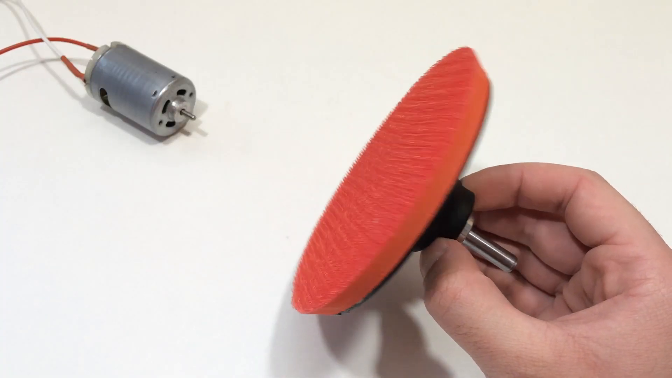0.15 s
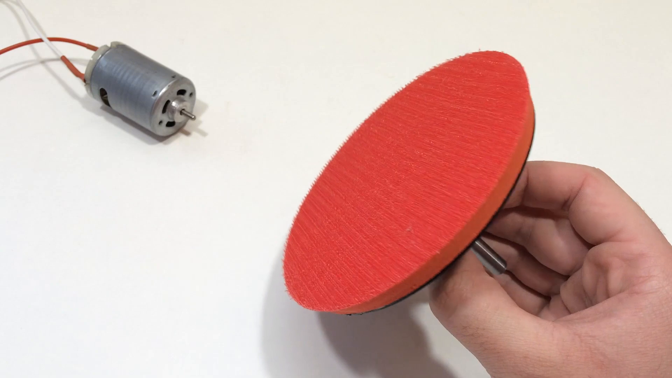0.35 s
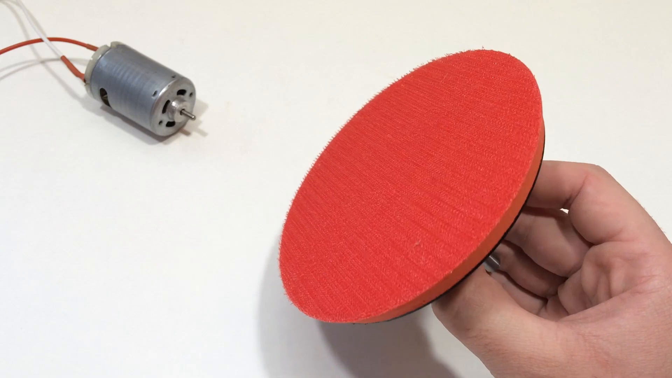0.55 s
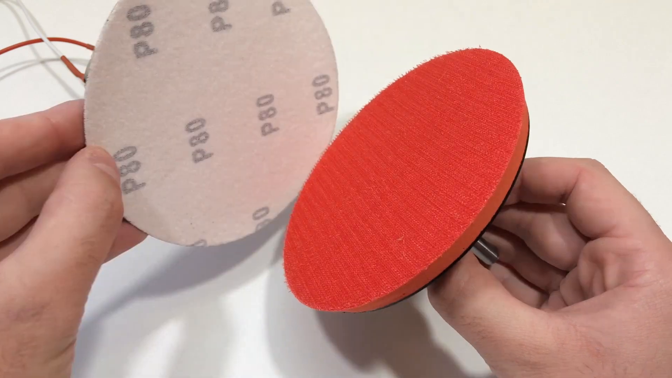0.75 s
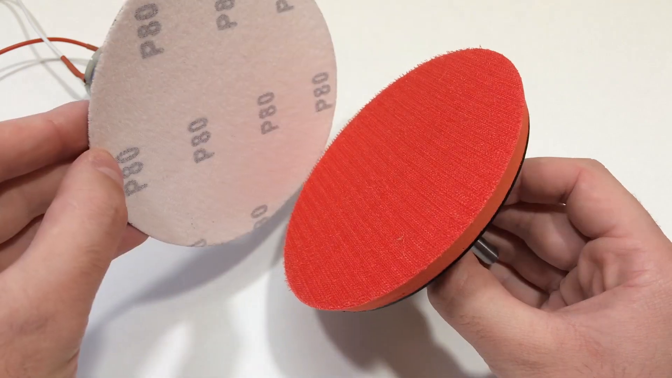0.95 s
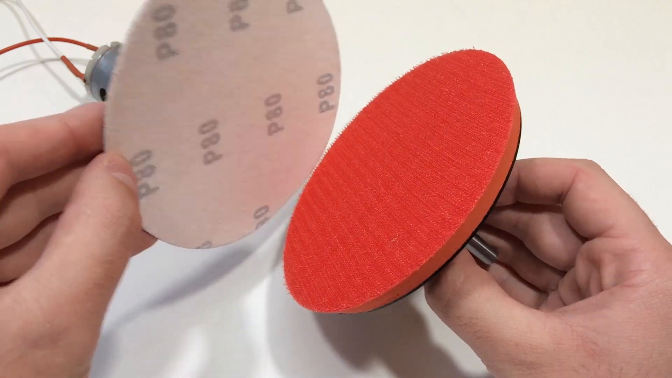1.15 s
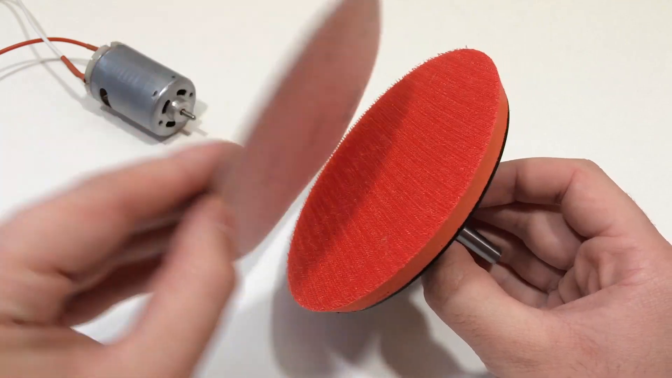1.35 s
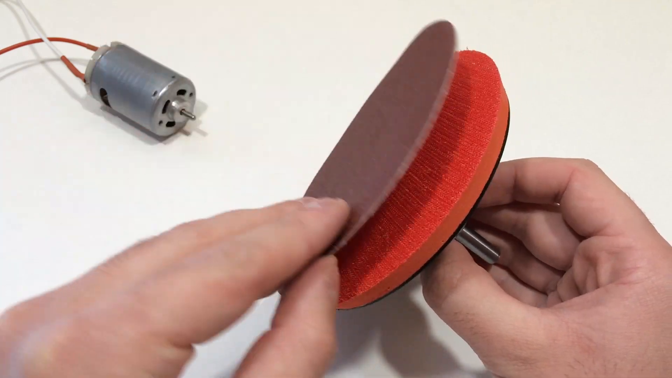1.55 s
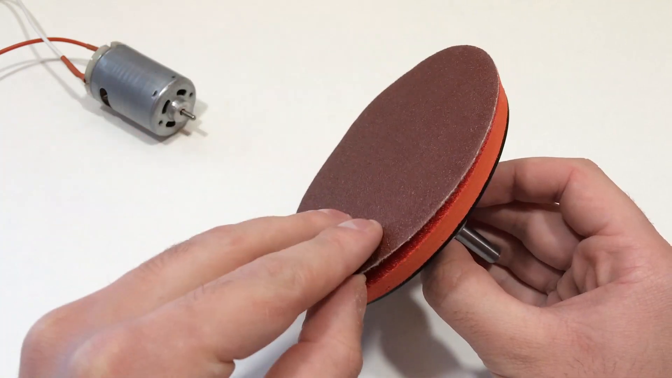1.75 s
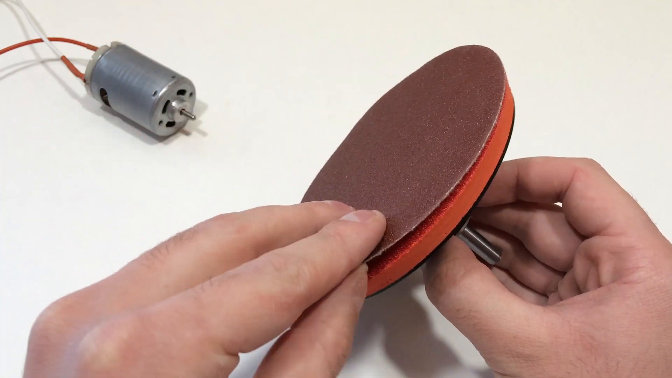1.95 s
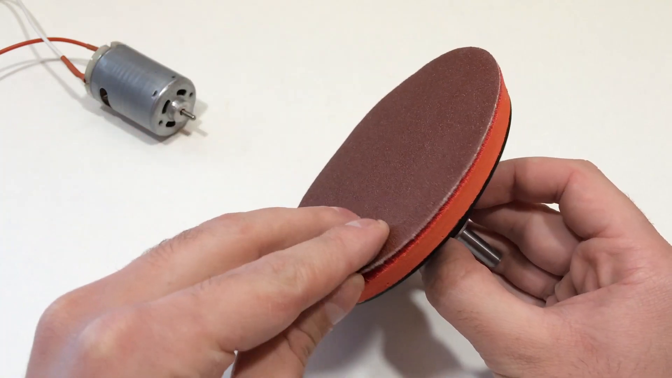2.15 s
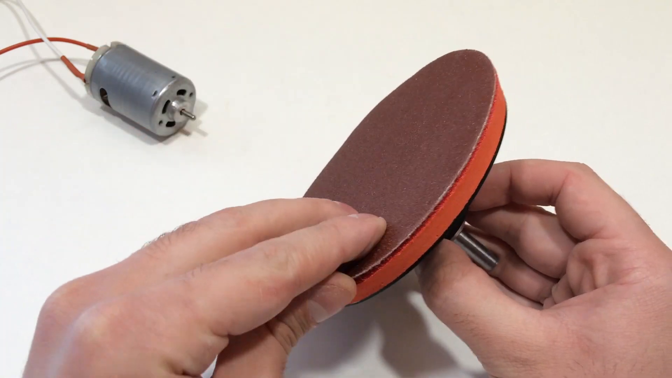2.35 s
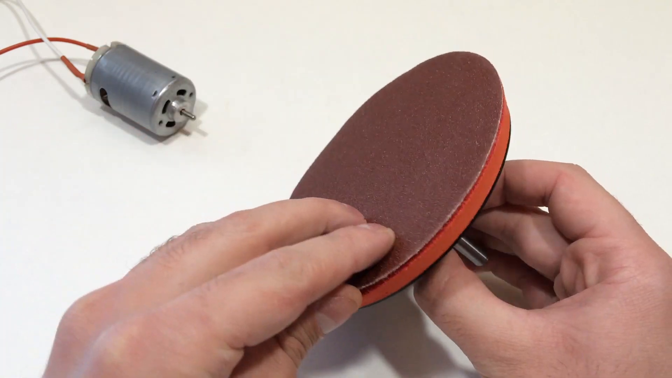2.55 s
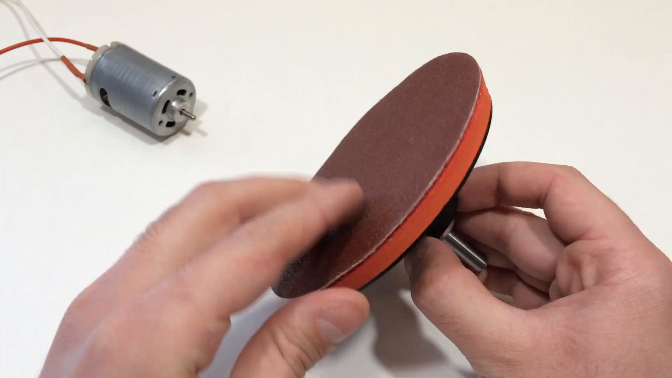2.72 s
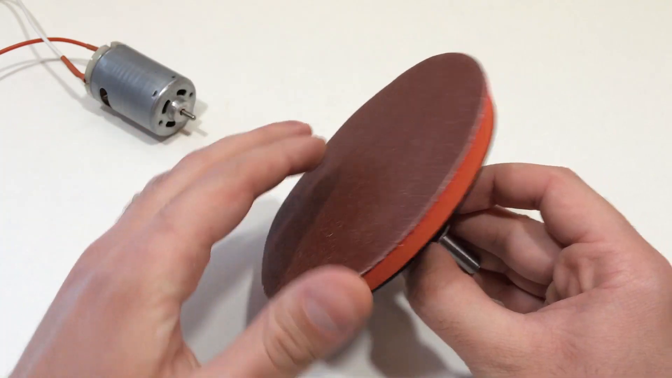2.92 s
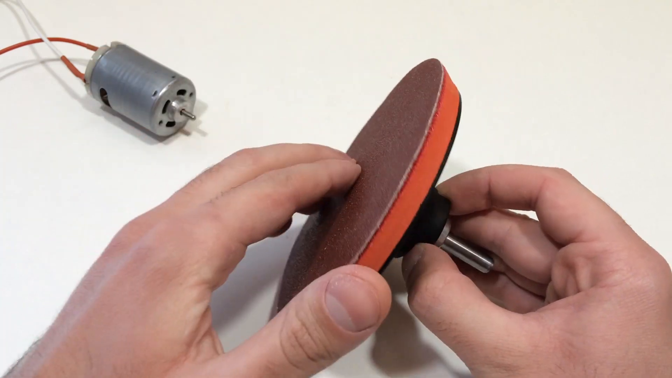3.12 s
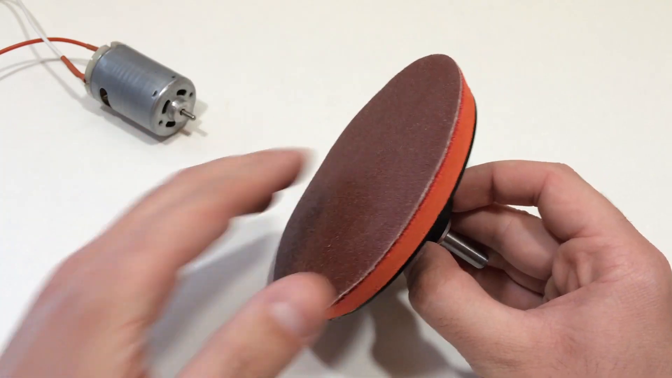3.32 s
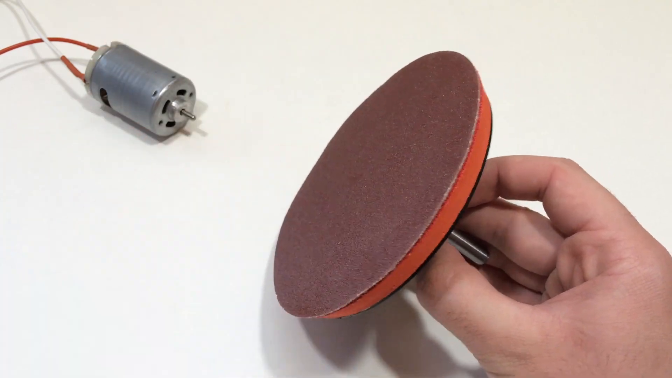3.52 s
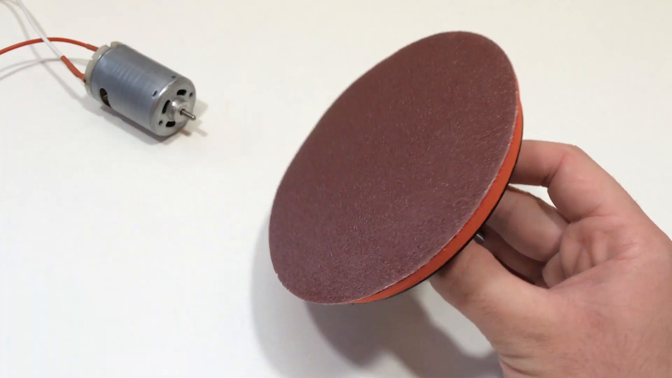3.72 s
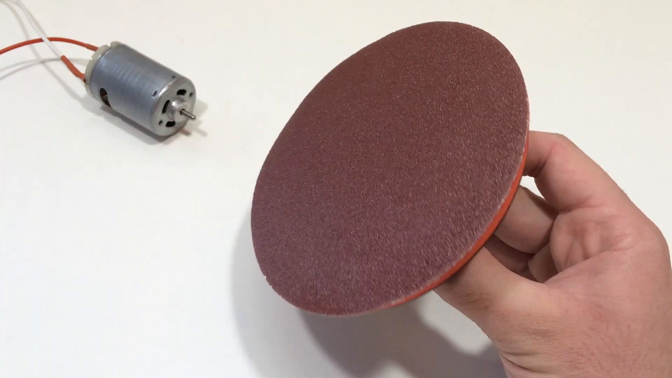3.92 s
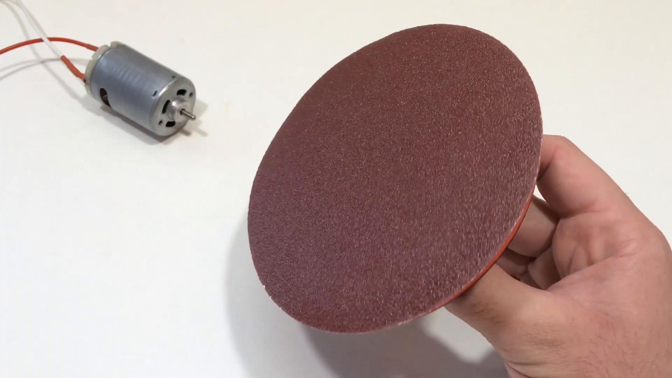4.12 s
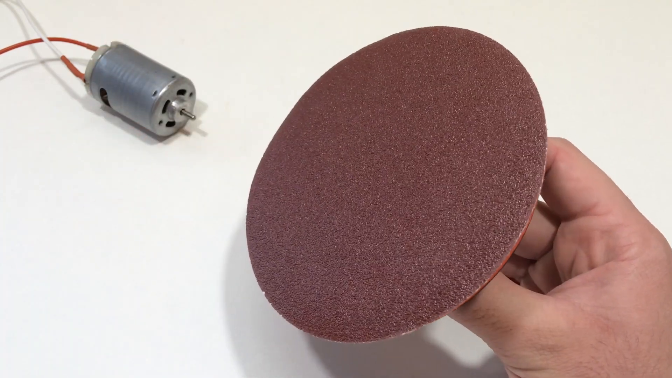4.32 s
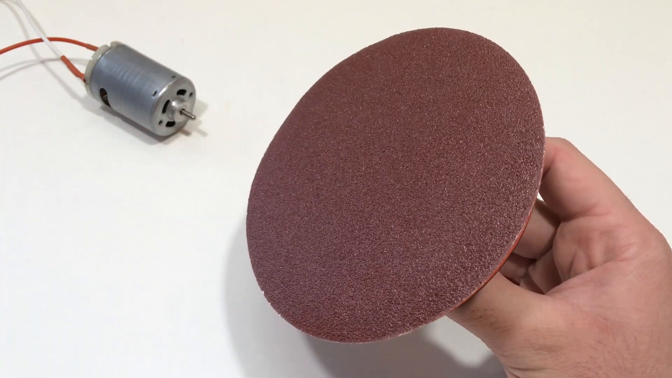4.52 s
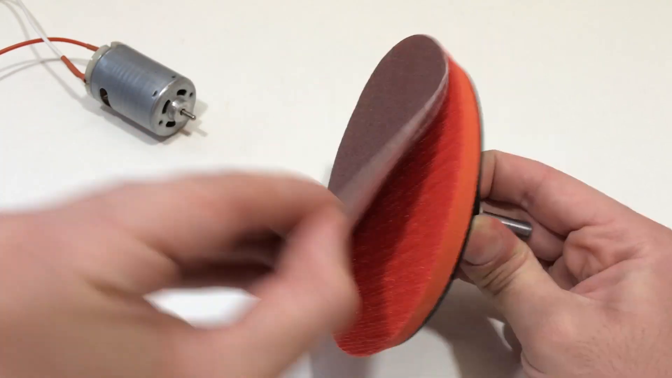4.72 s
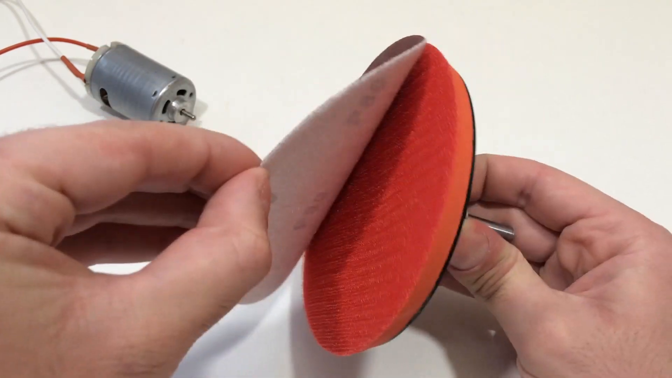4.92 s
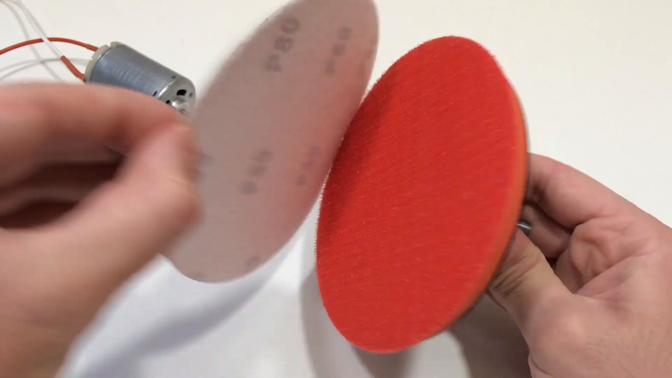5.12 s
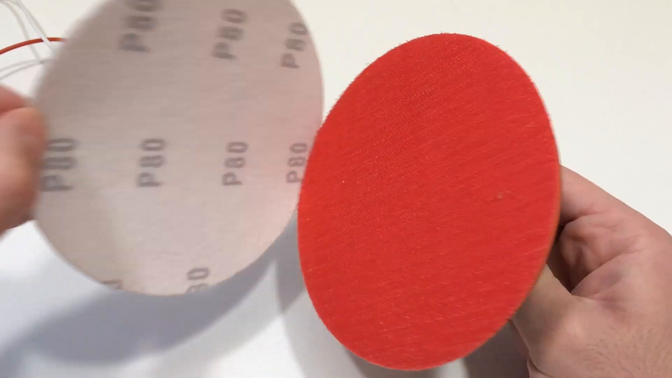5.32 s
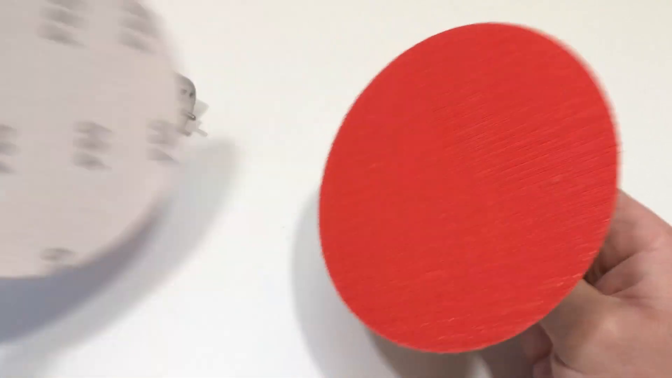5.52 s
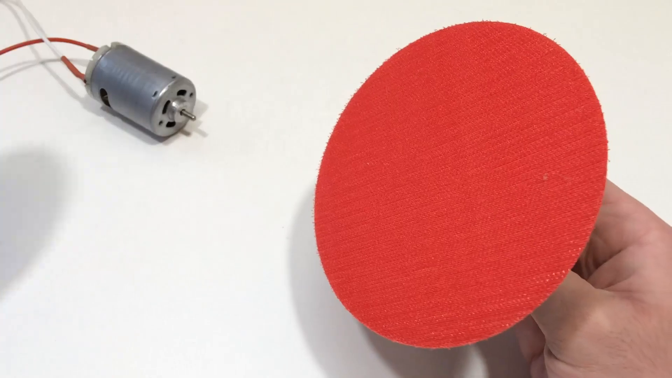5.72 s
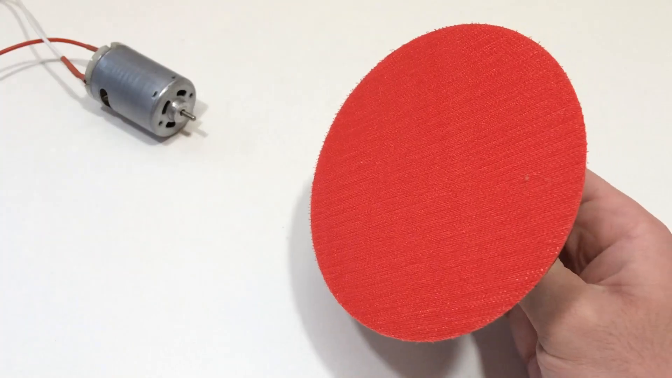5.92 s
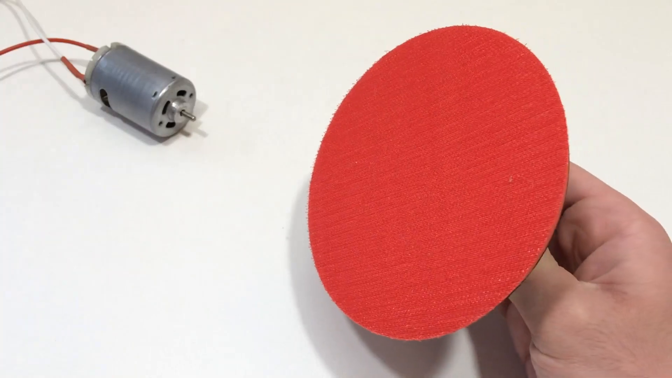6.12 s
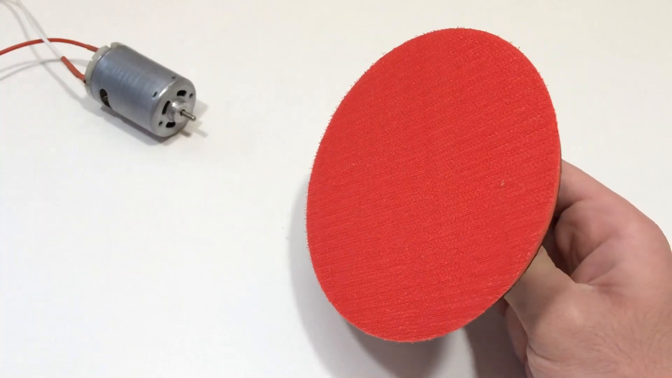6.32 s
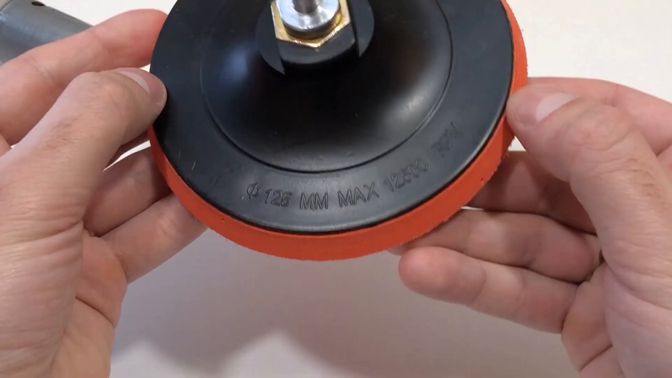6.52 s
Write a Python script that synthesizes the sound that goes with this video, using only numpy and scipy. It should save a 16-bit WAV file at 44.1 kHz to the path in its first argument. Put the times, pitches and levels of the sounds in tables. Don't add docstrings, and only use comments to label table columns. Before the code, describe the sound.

Close, dry indoor sound: a few light clicks and very faint scratches as abrasive paper is pressed onto a foam-backed pad, against quiet hiss and deep rumble. Later, hooks let go in dense bright bursts, two quick tearing strokes with papery ringing and dull thumps, then a flapping slap and loose snaps. Only the quiet background and a faint distant engine remain, fading out.

```python
import sys
import numpy as np
from scipy import signal
from scipy.fft import rfft, irfft
from scipy.io import wavfile
from scipy.ndimage import uniform_filter1d

SR = 44100
rng = np.random.default_rng(int(sys.argv[2]) if len(sys.argv) > 2 else 0)


def to_wav(sig):
    pcm = np.clip(np.atleast_2d(sig), -1, 1) * 32767
    pcm = np.round(pcm).astype(np.int16)
    wavfile.write(sys.argv[1], SR, pcm.T)


def volts_from_decibels(level):
    exponent = np.asarray(level, float) / 20
    return 10 ** exponent


N = 289456


def evened(x):
    return x / np.sqrt(np.mean(x ** 2) + 1e-20)


def read(points, hz):
    f, value = np.transpose(points)
    return np.interp(np.log(hz + 1), np.log(f + 1), value)


def add(mix, start_s, sound):
    part = mix[round(start_s * SR):][:len(sound)]
    part += sound[:len(part)]


def ring(modes, size, tune=1):
    t = np.arange(size) / SR
    out = np.zeros(size)
    for k, (hz, width, db) in enumerate(modes):
        swell = 1 - np.exp(-2 * np.pi * width * t)
        decay = np.exp(-np.pi * width * t)
        out += (-1) ** k * volts_from_decibels(db) * width * swell * decay * np.sin(2 * np.pi * hz * tune * t)
    return out


def hiss():
    # pitch_hz, level_db
    hiss_tone = [(20, -10), (40, 1.5), (300, 3.5), (3000, 0), (12000, -2), (15300, 0), (15900, -23),
                 (16400, -42.5)]
    hz = np.fft.rfftfreq(N, 1 / SR)
    noise = rfft(rng.standard_normal((2, N)))
    return volts_from_decibels(-61.5) * evened(irfft(noise * volts_from_decibels(read(hiss_tone, hz)), N))


def rumble(lump_db=2.0):
    # time_s, level_db
    rumble_fade = [
        (.73, -6.5),
        (1.31, 0),
        (2.34, 0),
        (2.68, -1),
        (4.05, 0.1),
        (4.22, -1),
        (5.65, -0.2),
        (6.496, -9.5),
        (6.56, -17),
    ]
    # pitch_hz, width_hz, level_db
    deep_hum = [(58.8, 13, 4.5), (38, 20, -22.5)]
    low_hum = [(92.4, 9, 0.5), (107.8, 8.9, 1.5), (135.2, 12, 2), (170.5, 9.2, 2), (203.4, 12, -3.5),
               (241, 17.8, -7), (308.8, 26.6, -5.5), (379.5, 45, -19.5)]
    far_hum = [(567, 560, 6.5), (1044, 480, 8.5), (2000, 920, -2.5)]
    s, faded_db = np.transpose(rumble_fade)
    t, out = np.arange(N) / SR, np.zeros(N)
    # its tones, level_db, how strongly it follows the fade
    for modes, db, follows in [(deep_hum, -59, 1.7), (low_hum, -58, 1.2), (far_hum, -72, 1)]:
        lumps = volts_from_decibels(lump_db * evened(uniform_filter1d(rng.standard_normal(N), size=2500)))
        hum = signal.oaconvolve(lumps * rng.standard_normal(N), ring(modes, size=6000))[:N]
        out += volts_from_decibels(db + follows * np.interp(t, s, faded_db)) * evened(hum)
    return out * (t > s[0])


def rustle(per_s=6000, spread_db=2.0, throb_db=3.0):
    # start_s, end_s, level_db, pitch_hz, width_hz
    strokes = [(1.009, 1.065, -70, 5000, 5100), (2.19, 2.307, -69, 7950, 8000),
               (2.755, 2.804, -62, 4300, 2000), (2.77, 2.775, -50.5, 4400, 2200),
               (2.803, 2.856, -65, 5000, 8000), (3.098, 3.107, -58, 2230, 890),
               (3.103, 3.138, -67, 1960, 500), (2.816, 2.84, -63, 2150, 400),
               (3.338, 3.365, -67.5, 2200, 497), (3.33, 3.373, -67.5, 3540, 4000),
               (4.69, 4.724, -53, 5000, 5000), (4.772, 4.904, -38, 4500, 7000),
               (4.871, 4.899, -31.5, 2300, 700), (4.848, 4.857, -29.5, 3200, 1200),
               (5.132, 5.167, -37.5, 5000, 7000), (5.195, 5.217, -32, 7470, 4970),
               (5.268, 5.318, -41.5, 6500, 7040), (5.513, 5.558, -37.5, 5500, 7000),
               (6.18, 6.2, -69.5, 1700, 910), (6.301, 6.322, -70, 1200, 700)]
    chosen = rng.random(N) < per_s / SR
    grains = np.sign(rng.standard_normal(N)) * chosen * volts_from_decibels(spread_db * rng.exponential(1, N))
    grains *= volts_from_decibels(throb_db * evened(uniform_filter1d(rng.standard_normal(N), size=120)))
    out = np.zeros(N)
    for start_s, end_s, db, hz, width in strokes:
        stroke = grains[round(start_s * SR):round(end_s * SR)]
        rise = np.minimum(np.arange(len(stroke)) / (SR * 0.00408), 1)
        fall = np.minimum(np.linspace(4, 0, len(stroke)), 1)
        sound = np.convolve(stroke * rise * fall, np.diff(ring([(hz, width, 0)], size=200)))
        add(out, start_s, volts_from_decibels(db) * evened(sound))
    return out


def cluster(start_s, ms, parts_db, fade_db, snaps_per_ms=5.5, spread_db=3.5, detune=0.085):
    # pitch_hz, width_hz, level_db
    disc_flex = [(1382, 295, -2), (1620, 366, 6), (2200, 980, -3)]
    paper = [(2650, 740, -7.5), (3130, 316, 7.5), (4520, 1350, 2)]
    hook = [(5500, 730, 4.5), (6830, 1150, 6.5), (7500, 2140, -1.5)]
    fibre = [(8900, 3500, 1.5), (11800, 2700, 2), (14100, 2800, -2.5)]
    # time_s, pitch ratio of its flex
    tension = [
        (4.83, 0.99),
        (4.875, 1.15),
        (5.06, 0.99),
        (5.35, 1.036),
        (5.56, 0.87),
    ]
    when, size, sign = rng.uniform(.02, 1, (3, 40))
    when[0] = 0
    used = np.arange(40) < max(round(snaps_per_ms * (ms - .15)), 1)
    force = used * np.sign(sign - .5) * volts_from_decibels(-spread_db * np.log(size) - fade_db * when)
    snaps = np.zeros(400)
    np.add.at(snaps, (when * min(ms, 9) * SR / 1000).astype(int), force)
    bent = np.interp(start_s, *np.transpose(tension))
    parts = (disc_flex, paper, hook, fibre)
    out = np.zeros(699)
    for modes, db, turn, taut in zip(parts, parts_db, rng.uniform(.02, 1, 4), (bent, 1, 1, 1)):
        sound = np.convolve(snaps, ring(modes, size=300, tune=taut + detune * (2 * turn - 1)))
        sound /= np.linalg.norm(sound) + 1e-12
        out += volts_from_decibels(db) * sound * np.sqrt((ms + 0.53) * SR / 1000)
    return out


def hooks(rows, mix_db, fade_db, scatter_db=0.5):
    follows = np.array((0.93, 1.06, 0.039, 0.0057))
    out = np.zeros(N)
    for start_s, ms, db, disc_db in rows:
        scatter = scatter_db * (2 * rng.uniform(.02, 1, 4) - 1)
        parts_db = db + np.array(mix_db) + disc_db * follows + scatter
        add(out, start_s, cluster(start_s, ms, parts_db, fade_db))
    return out


def touches():
    # start_s, length_ms, level_db, disc ring over hook snap_db
    placing = [(1.0535, 1.7, -54, -3), (1.0742, 1.6, -54, -3), (1.265, 0.99, -46.5, -0.5),
               (1.3349, 3.4, -56.5, -2.5), (1.4346, .2, -24.5, -7.5), (1.4415, 0.69, -48, 2.5),
               (1.4947, 0.51, -50, -3.5), (1.538, .2, -39, -2.5), (1.5481, 1.3, -54, -4),
               (1.5538, 2.6, -56, -2), (1.654, 1.4, -63.5, 2.5), (1.7363, .53, -37, -12),
               (1.7453, 0.77, -41.5, -11.5), (4.4158, 3.36, -50.5, -6)]
    pressing = [(1.9211, 0.37, -53.5, -10), (1.9547, 2.7, -62, -10), (2.0553, .8, -56.5, -6),
                (2.0899, 2.4, -59.5, -8), (2.1596, 1.85, -56.5, -1.5), (2.2033, 2.2, -59, -9),
                (2.228, 2.4, -63, -1), (2.2509, 2.1, -58, -4), (2.3077, 1.3, -58, -11),
                (2.361, 1.86, -48.5, -12.5), (2.3772, 3.6, -52.5, -17), (2.5497, .83, -59, -10),
                (2.5833, 2.3, -52, -19), (2.7402, 3.4, -58, -7), (2.7626, 4.7, -60, -4),
                (2.7712, 0.94, -57, 5), (2.8206, 4, -60, -3), (2.8258, 4.2, -60, -5),
                (3.3328, 2.3, -65, -7), (3.3478, 4.8, -60.5, -7), (3.3853, .2, -44.5, -20)]
    placed = hooks(placing, (-0.8, 2.5, -1, -13), fade_db=20.0)
    return placed + hooks(pressing, (-3.5, 7, -1, 0.4), fade_db=6.0)


def thumps():
    # start_s, peak level_db, pitch_hz
    jerks = [(2.77, -34.5, 58), (4.72, -46, 110), (4.784, -31.5, 326), (4.822, -25, 210),
             (4.865, -34.5, 145), (5.135, -31.5, 125), (5.14, -26.5, 560), (5.148, -30.5, 333),
             (4.5, -40, 90), (5.199, -26.5, 337), (5.3, -32.5, 268), (5.488, -36, 900), (5.4885, -30, 1100),
             (5.28, -32, 590), (5.55, -30.5, 890), (5.528, -26, 1070), (5.528, -32, 200), (5.525, -39, 530),
             (4.74, -43, 650), (5.532, -32, 303)]
    # pitch_hz, level_db, time to die by 60 dB_s
    slap = [(218, -27, 0.036), (377, -25, 0.037), (530, -16, 0.0247), (650, -30, .028), (988, -21, 0.033),
            (1274, -32, 0.036)]
    # start_s, level_db, pitch_hz, t60_s, rise_ms; jerks take 0.054 s and 3 ms at 300 Hz
    tones = [(s, db, hz, 0.054 * (300 / hz) ** 0.67, 3 * 300 / hz) for s, db, hz in jerks]
    tones += [(5.3648, db, hz, t60, 0.37 * 3 * 300 / hz) for hz, db, t60 in slap]
    out, t = np.zeros(N), np.arange(9000) / SR
    for start_s, db, hz, t60_s, rise_ms in tones:
        swell = 1 - np.exp(-t * 1000 / rise_ms)
        add(out, start_s, volts_from_decibels(db - 60 * t / t60_s) * swell * np.sin(2 * np.pi * hz * t))
    return out


def drone():
    # pitch_hz, level_db
    engine = [(91, -60), (281, -69)]
    start_s, end_s, waver_db = 4.6, 6.2, 1.5
    t = np.arange(start_s, end_s, 1 / SR)
    drift = uniform_filter1d(rng.standard_normal((len(engine), N)), size=6000)
    waver = volts_from_decibels(waver_db * evened(drift))[:, :len(t)]
    tones = sum(volts_from_decibels(db) * w * np.sin(2 * np.pi * hz * t) for (hz, db), w in zip(engine, waver))
    out = np.zeros(N)
    add(out, start_s, signal.windows.tukey(len(t), .3) * tones)
    return out


def tears():
    # start_s, length_ms, level_db, disc ring over hook snap_db
    first_pull = [(4.6967, 3.5, -49, -5), (4.7063, 1.5, -45.5, -15), (4.7168, 1.15, -33.5, -6),
                  (4.7317, 0.87, -38, -11), (4.7405, 0.79, -31.5, -4.5), (4.7686, .5, -25.5, -15),
                  (4.7698, 1.37, -35, 2.5), (4.7746, 2.2, -39.5, -4), (4.7807, 3.3, -23, -15),
                  (4.7854, 5.7, -25, -6.5), (4.7912, 7.3, -32.5, -5), (4.8018, 4.6, -28.5, -9),
                  (4.8098, 4.8, -24, -4), (4.8181, 3.1, -21, -4.5), (4.8265, 6.1, -26, 0.5),
                  (4.8378, 0.93, -26.5, -2), (4.8496, 3.8, -27, 5.5), (4.8542, 2.1, -32, 0),
                  (4.8618, 0.28, -26, 3), (4.866, 1.1, -33.5, 3), (4.871, 2.12, -26, 1.5),
                  (4.8751, 5.1, -22.5, -3.5), (4.8833, 3, -28.5, 5), (4.8874, 3, -22, -6),
                  (4.94, 1.05, -33, -4.5)]
    second_pull = [(5.0665, 1.77, -38, 0.4), (5.1043, 1.78, -35.5, -2.5), (5.1187, 1.2, -41, -1.5),
                   (5.129, 1.1, -36.5, 2), (5.131, .88, -25, 3), (5.1336, 3.6, -25.5, -8.5),
                   (5.1401, 4.2, -24.5, 3), (5.1483, 3.6, -23.5, -3.5), (5.1525, 3.8, -24.5, -3.5),
                   (5.1678, 1.1, -22.5, -2.5), (5.1744, .2, -23, 2), (5.1807, 4, -20.5, -5),
                   (5.192, 4.2, -18.5, -6), (5.2016, 4.5, -17, -7.5), (5.21, 4, -22, -4.5),
                   (5.2238, .8, -32.5, -4.5), (5.251, .2, -35, -3), (5.2621, 1.2, -21.5, -11.5),
                   (5.2673, 0.78, -21, -5.5), (5.2784, 0.22, -23, -8), (5.2818, 1.97, -23, -9),
                   (5.285, 3.9, -28, -3.5), (5.2987, 1.05, -21.5, -6.5), (5.311, 2.2, -26.5, -4),
                   (5.327, 0.51, -28.5, -6)]
    last_strip = [(5.3536, 0.2, -31, -5), (5.3558, 0.22, -25, -4.5), (5.3604, .51, -26, -1.5),
                  (5.364, 1.45, -29, -4), (5.389, 1.3, -56, 0), (5.3945, .53, -41, 2),
                  (5.4032, 0.18, -28, -4.5), (5.4102, .6, -35, -8), (5.4211, 1.05, -38, -1),
                  (5.4361, 0.22, -27, -4), (5.4529, .2, -37, 3), (5.4693, .2, -33.5, -9.5),
                  (5.4892, .2, -23.5, -9), (5.4919, 0.33, -32, -5.5), (5.495, 5.8, -46.5, -3),
                  (5.5124, .73, -32, -1.5), (5.5165, 2.14, -28, -6), (5.5262, 3.4, -25, -3.5),
                  (5.5338, 4.8, -30, -7), (5.5438, 3.4, -31, -3), (5.5507, 4.63, -24.5, -10.5)]
    pulled = hooks(first_pull + second_pull, (-1, 1, -1.5, -7.5), fade_db=3.0)
    stripped = hooks(last_strip, (1.5, -1, 0, -10.5), fade_db=-4.0)
    return pulled + stripped + rustle()


def shaken_pad(torn):
    # pitch_hz, width_hz, level_db
    pad_tones = [(330, 55, -3), (580, 230, -2), (1007, 205, 7.5)]
    direction = rng.choice([-1., 1.], N // 64 + 1).repeat(64)[:N]
    shaken = signal.oaconvolve(abs(torn) * direction, ring(pad_tones, size=2000))[:N]
    return volts_from_decibels(-23) * evened(shaken) * np.std(torn)


def room(x):
    # pitch_hz, time to die by 60 dB_s
    ring_times = [(300, 0.12), (800, 0.29), (2100, 0.17), (5500, 0.14), (12000, 0.15)]
    # delay_ms, level_db
    near_echoes = [(.8, -21), (1.4, -22), (2.1, -29.5), (3.6, -16.5), (7.0, -21)]
    taps = np.zeros(SR // 2)
    at = np.arange(120, SR // 2 - 10, 10) + rng.integers(0, 10, (SR // 2 - 121) // 10)
    taps[at] = rng.choice([-1., 1.], len(at))
    hz, t, bands = signal.stft(taps, SR, nperseg=128)
    fade = volts_from_decibels(-60 * t / read(ring_times, hz)[:, None])
    tail = signal.istft(bands * fade, SR, nperseg=128)[1]
    tail *= volts_from_decibels(-12) / np.linalg.norm(tail)
    for ms, db in [(0, 0.0042)] + near_echoes:
        tail[round(ms * SR / 1000)] += volts_from_decibels(db)
    return signal.oaconvolve(x, tail)[:N]


def scene():
    torn = tears()
    close = touches() + torn + shaken_pad(torn) + thumps()
    close = signal.sosfilt(signal.butter(2, 60, "high", fs=SR, output="sos"), close)
    mono = room(close) + rumble() + drone()
    return np.array([mono, mono])


def low_pass(x):
    return signal.sosfilt(signal.butter(12, 16480, fs=SR, output="sos"), x)


def record(dry):
    rounded = .8 * np.tanh(dry / .8)
    cut = signal.sosfilt(signal.butter(2, 42, "high", fs=SR, output="sos"), rounded)
    cut = signal.sosfilt(signal.cheby1(10, .5, 15000, fs=SR, output="sos"), cut)
    return low_pass(cut + hiss())


dry = scene()
out = record(dry)
to_wav(out)
```